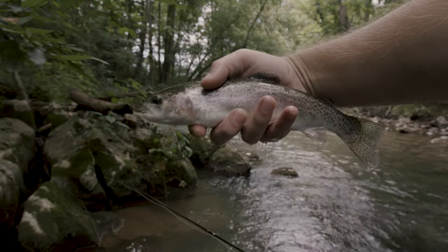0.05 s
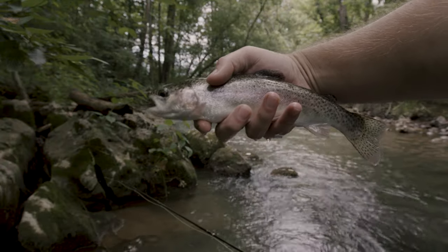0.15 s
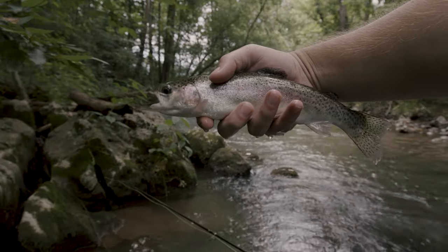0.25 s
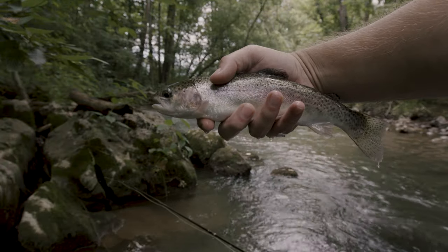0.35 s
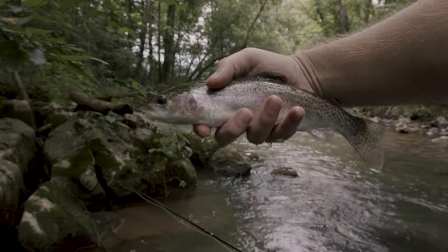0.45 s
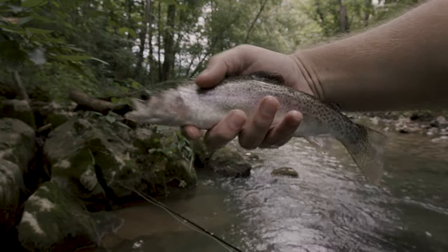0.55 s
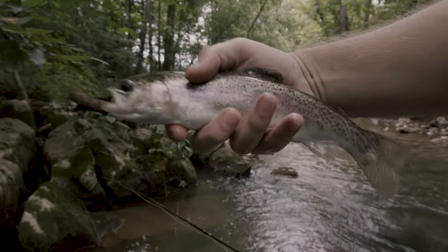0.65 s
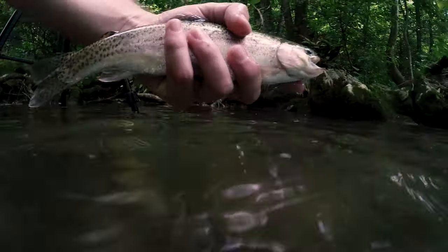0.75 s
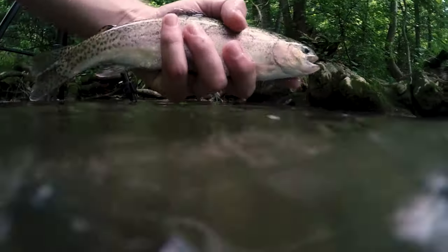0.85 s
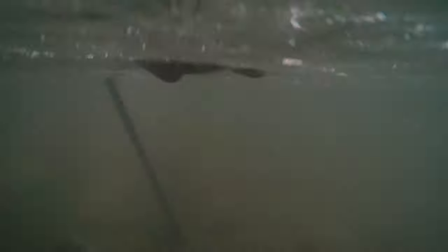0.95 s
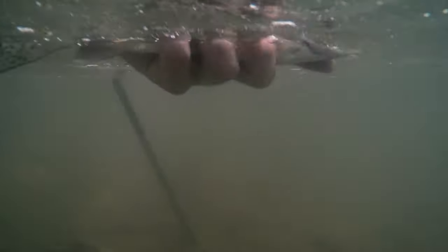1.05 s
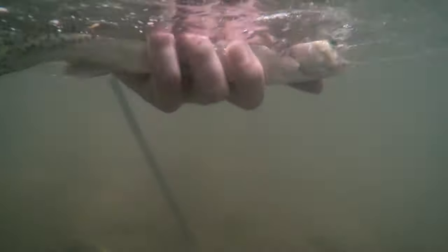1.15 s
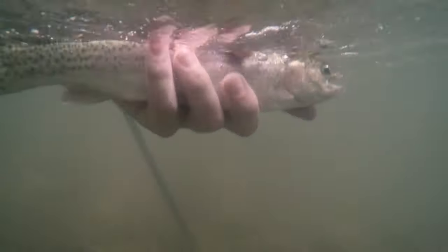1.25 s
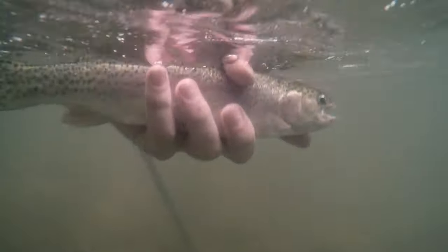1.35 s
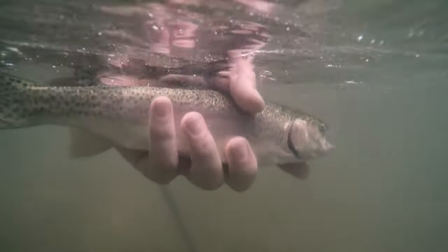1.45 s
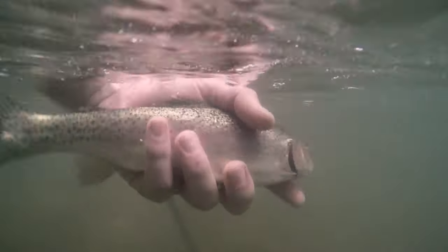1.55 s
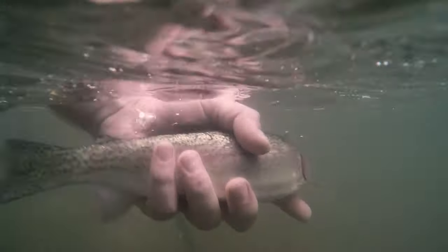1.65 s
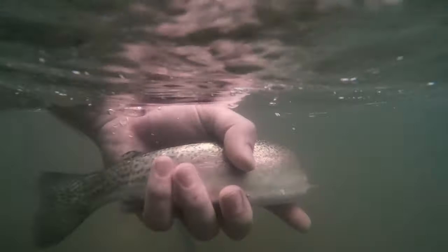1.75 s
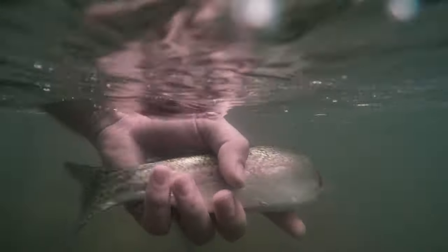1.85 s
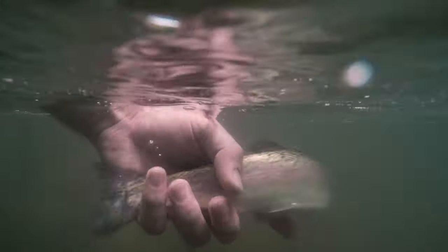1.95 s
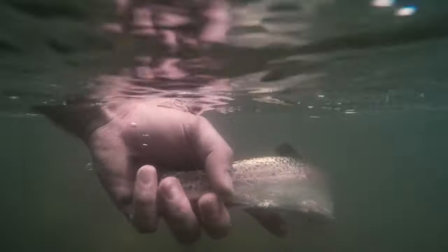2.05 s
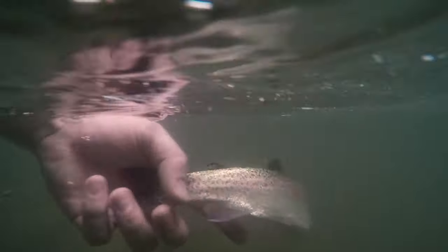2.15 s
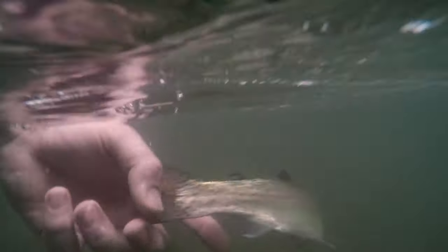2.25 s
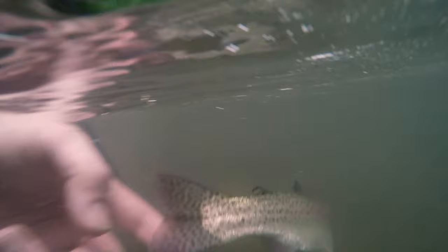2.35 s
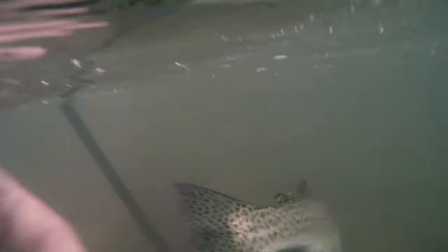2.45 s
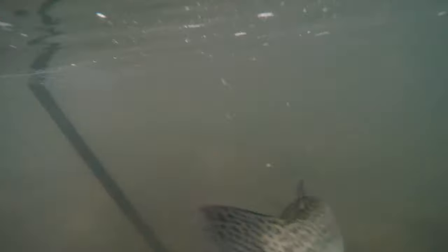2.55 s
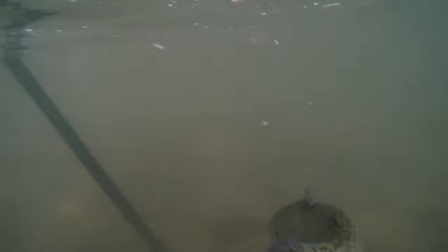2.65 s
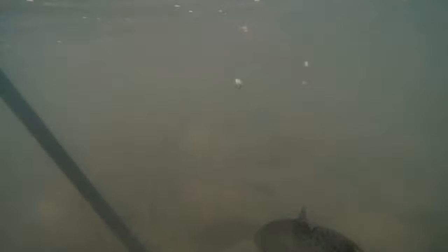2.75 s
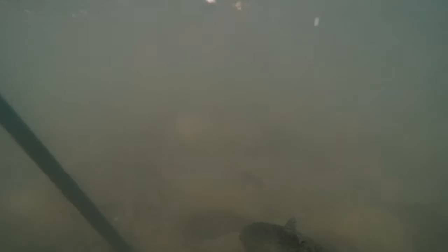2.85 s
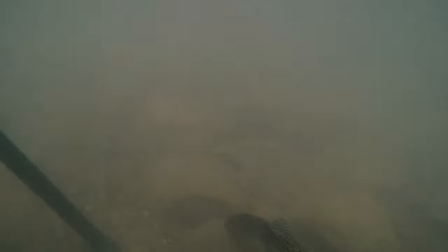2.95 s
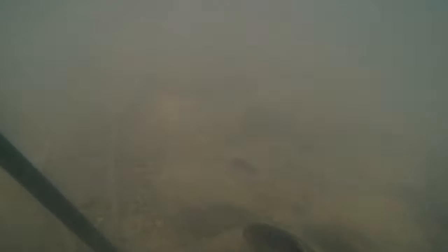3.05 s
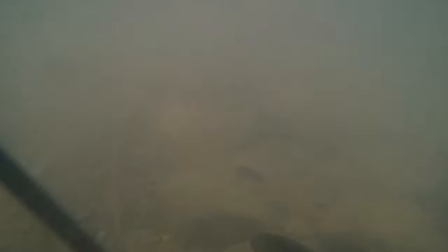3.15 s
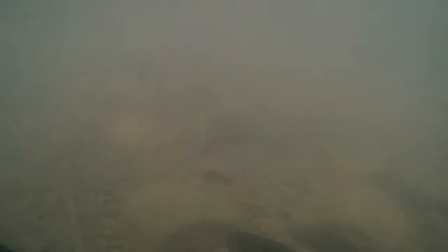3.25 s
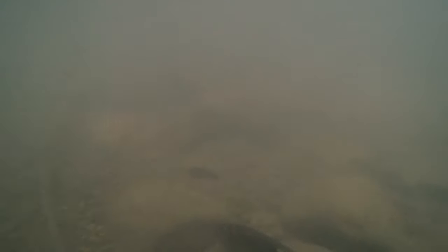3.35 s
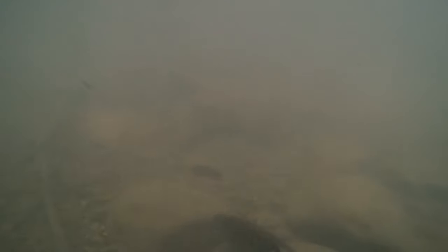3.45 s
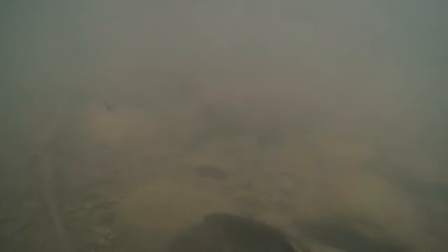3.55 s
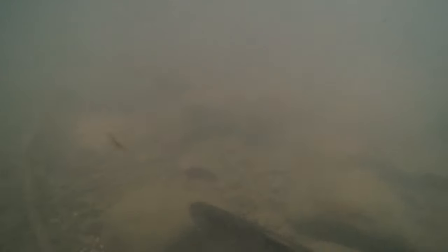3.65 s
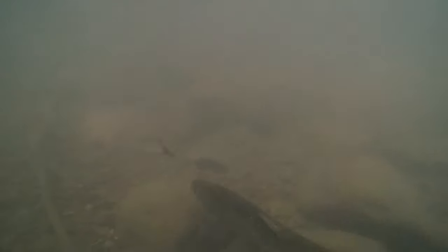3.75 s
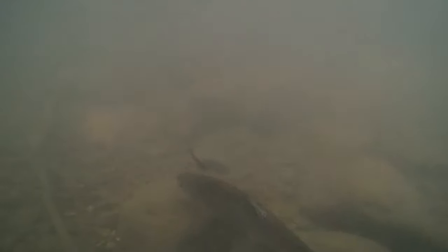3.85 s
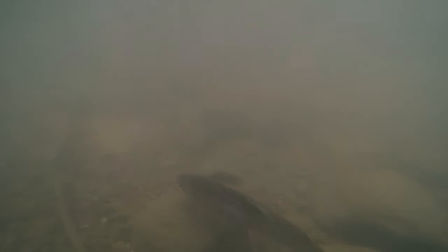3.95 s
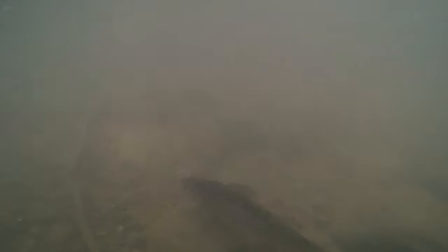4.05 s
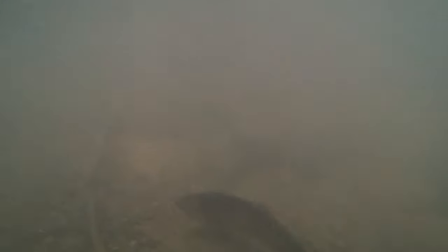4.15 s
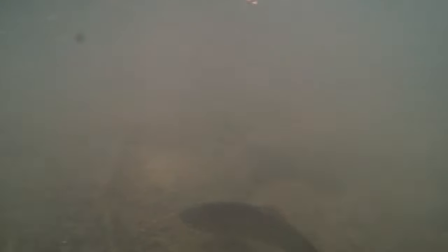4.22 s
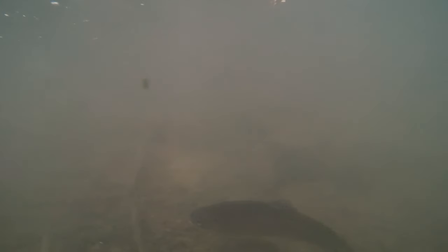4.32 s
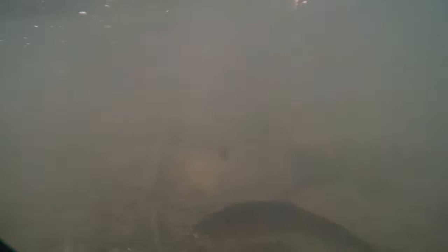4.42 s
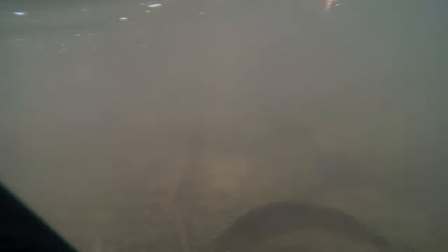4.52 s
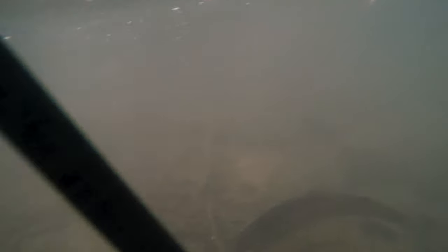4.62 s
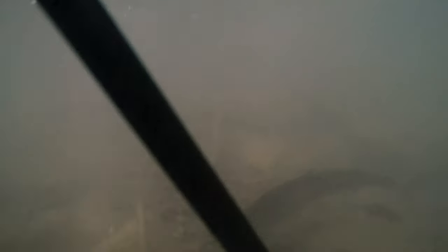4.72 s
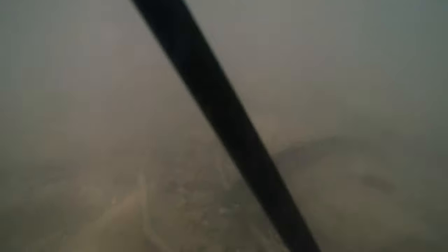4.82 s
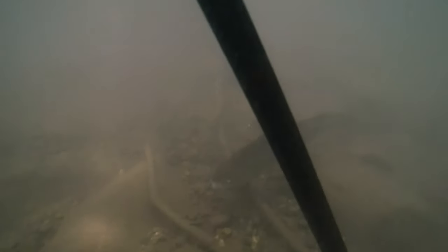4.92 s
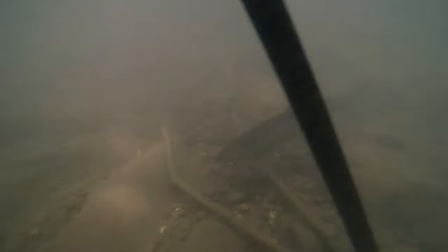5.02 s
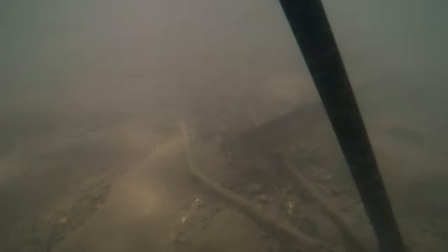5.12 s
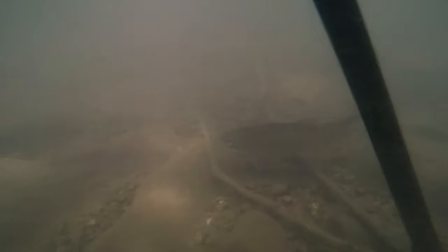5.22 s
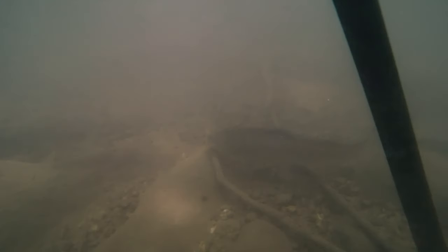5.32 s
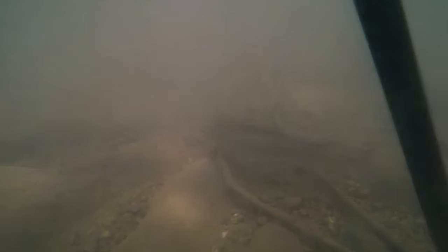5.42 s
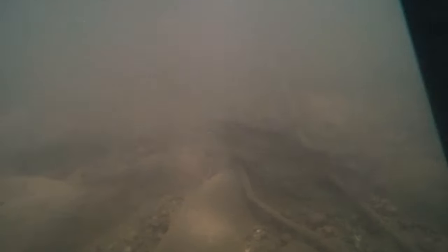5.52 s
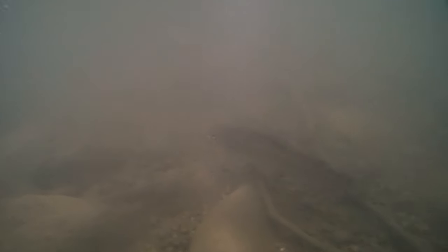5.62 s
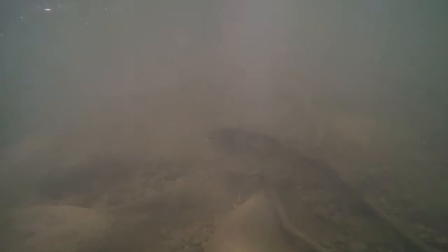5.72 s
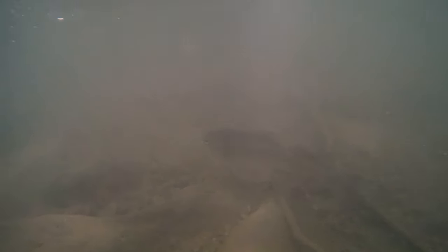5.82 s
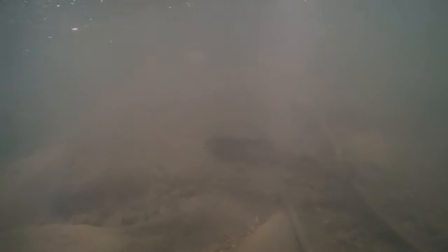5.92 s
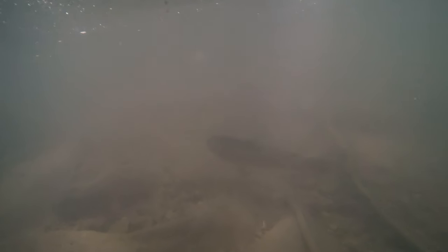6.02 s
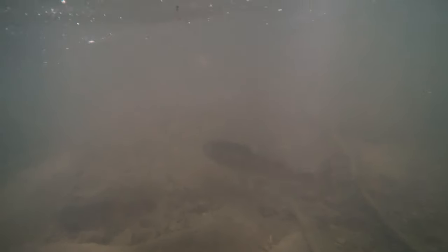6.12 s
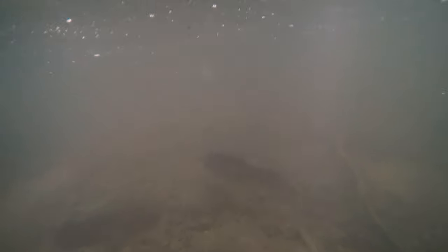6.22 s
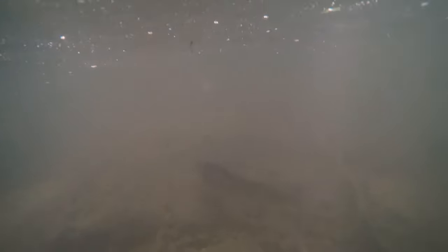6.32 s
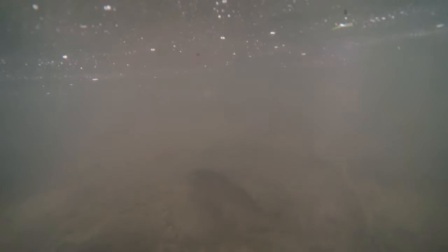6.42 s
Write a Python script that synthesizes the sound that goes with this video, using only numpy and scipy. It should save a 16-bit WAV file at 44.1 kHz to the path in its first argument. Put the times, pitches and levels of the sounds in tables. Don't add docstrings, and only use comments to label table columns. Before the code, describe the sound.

Close to a small woodland stream, water rushes brightly for under a second. The microphone, sealed in a case, plunges beneath the surface: dense, hard bubble bursts, crackle and gurgling churn, all close and mono. It calms to deep muffled rumble, then pops again with hollow knocks as a fish is released. One big bass thump rocks the case; afterwards only low rumble, occasional knocks and tiny bubbles remain.

```python
import sys
import numpy as np
from scipy import signal
from scipy.fft import rfft, irfft
from scipy.io import wavfile
from scipy.ndimage import uniform_filter1d

SR = 44100
rng = np.random.default_rng(int(sys.argv[2]) if len(sys.argv) > 2 else 0)


def boost(x):
    u = np.asarray(x, float) / 20
    return 10 ** u


def transcribe(u):
    v = np.clip(np.atleast_2d(u).T, -1, 1)
    q = np.round(v * 32767).astype(np.int16)
    wavfile.write(sys.argv[1], SR, q)


N = 285768

# start in seconds, peak in dB, pitch in Hz, second pitch in Hz, crack in dB.
POCKETS = [(0.8104, -7.5, 1710, 1640, -59), (0.8176, -23, 1790, 705, -9),
           (0.8419, -11, 3700, 2280, -25), (0.868, -13.5, 590, 6260, -12.5),
           (0.874, -12.5, 2020, 690, -13), (0.8857, -22.5, 4540, 2230, -22.5),
           (0.8988, -23, 4500, 2630, -15), (0.9046, -11.5, 1020, 2900, -43.5),
           (0.9269, -20.5, 1020, 3700, -55.5), (0.932, -2.5, 2270, 4510, -40.5),
           (0.959, -23, 6700, 4350, -23), (0.9986, -27, 2210, 3900, 1), (1.0222, -7.5, 3560, 1910, -33),
           (1.0661, -13.5, 890, 660, -55), (1.0893, -16.5, 4000, 660, -42.5),
           (1.114, -20.5, 3470, 585, -24), (1.1204, -11.5, 3360, 5600, -17.5),
           (1.1366, -16.5, 4880, 1600, -12), (1.1421, -9, 1670, 680, 1.5),
           (1.1465, -10.5, 560, 2500, -15), (1.1609, -14.5, 3290, 1920, -25.5),
           (1.1706, -17, 3728, 1450, -17.5), (1.1896, -11.5, 3800, 1450, -1),
           (1.1944, 0.5, 3430, 1338, -3.5),
           (2.2032, -28, 3840, 1530, -38), (2.2529, 5, 1209, 710, -29.5),
                   (2.2718, -9, 1034, 610, -51), (2.2823, -13, 3356, 5100, 0),
                   (2.2996, -17.5, 2543, 1120, -52), (2.3081, -23.5, 3300, 2200, 1),
                   (2.3371, -9, 1650, 3500, -56), (2.3472, -19, 1690, 880, -28),
                   (2.3908, -11, 2100, 920, -54), (2.459, -17, 2510, 670, -28), (2.4673, -14, 659, 844, -7),
                   (2.4724, -11.5, 3717, 620, -3), (2.4894, -20.5, 2520, 397, -22),
                   (2.4982, -21, 3390, 1800, -46), (2.5114, -1.5, 1655, 600, -31.5),
                   (2.6519, -23.5, 2920, 6390, -25), (2.6943, -35, 5730, 2760, -20),
                   (2.709, -16, 2510, 560, -25), (2.744, -25.5, 2360, 4500, -17),
                   (2.761, -21, 2560, 1300, -12), (2.7953, -25, 4500, 1590, -28),
                   (2.8593, -24, 2340, 570, -15), (2.8756, -12.5, 1890, 3430, -26),
           (1.211, -17.5, 3530, 1740, -47), (1.229, -22, 4570, 1380, -26),
              (1.261, -24.5, 1785, 1066, -53), (1.6951, -28, 2570, 555, -36),
              (1.7074, -25.5, 575, 885, -45), (1.9782, -29, 513, 3190, -19),
              (1.9996, -25.5, 576, 3660, -40), (2.0742, -38.5, 4290, 2040, -6),
              (3.0173, -12.5, 600, 1160, -39.5), (3.1353, -21, 580, 930, -38),
              (3.1422, -17.5, 4830, 2650, -20), (3.1889, -21.5, 600, 1550, -49),
              (3.1979, -10, 600, 860, -39.5), (3.2183, -21.5, 500, 1460, -32),
              (3.2559, -34.5, 2580, 4200, -33), (3.6327, -34.5, 1540, 610, -40.5),
              (3.6477, -38, 1850, 556, -30), (3.6849, -37, 600, 1713, -39), (4.0956, -44, 3810, 5960, -5),
              (4.7276, -14.5, 1644, 2083, -43), (4.773, -18.5, 950, 1530, -43),
              (4.7929, -16, 1550, 1196, -46), (4.996, -41, 550, 1445, -40)]
# start in seconds, peak in dB, pitch in Hz.
SMALL_POCKETS = [(0.803, -31, 1720), (0.8586, -28, 5600), (1.0817, -22, 720), (1.104, -30, 3620),
                 (1.1262, -28, 1750), (1.1774, -23, 3800), (1.2445, -22.5, 1590), (1.2936, -45, 610),
                 (1.3785, -45.5, 2350), (1.5616, -39, 2800), (1.67, -37, 2760), (1.7297, -31, 3320),
                 (1.7548, -40, 1900), (1.889, -37, 3600), (1.9007, -44, 2660), (2.119, -37, 3800),
                 (2.5311, -25, 1670), (2.5702, -32.5, 3450), (2.5763, -32, 1860), (2.5852, -33.5, 3370),
                 (2.5995, -36.5, 2180), (2.613, -33, 1360), (2.6755, -44, 2820), (2.77, -34, 2260),
                 (2.8682, -37, 2010), (2.9703, -27, 1050), (3.2618, -28, 910), (3.6686, -37, 1650)]
SMALL_SECOND_HZ, SMALL_CRACK_DB = 600, -25
SECOND_DB, SECOND_SINKS = -7, 0.074
CRACK_HZ, CRACK_RISES = 9500, .15
TAIL_HZ, TAIL_WIDTH_HZ, TAIL_DB = 640, 38, -10.5

# start in seconds, peak in dB, pitch in Hz, 60 dB decay in seconds.
AIR_BUBBLES = [(1.211, -27, 1850, 0.047), (1.246, -20, 1640, 0.043), (1.263, -42.5, 1800, 0.13),
               (2.345, -13, 1780, 0.042), (2.515, -7, 1680, 0.028), (2.655, -24, 2175, 0.034),
               (4.733, -44, 1820, 0.11), (4.774, -15.5, 1450, 0.021), (4.8, -37.5, 1880, 0.041),
               (2.712, -20.5, 2250, 0.029), (2.837, -34, 2020, 0.053), (0.811, -33, 1600, 0.058),
               (0.764, -25, 324, 0.12), (0.774, -27.5, 207, 0.083), (0.779, -28, 4090, .01),
               (0.147, -27, 672, .05), (0.42, -33, 580, .06), (1.212, -27, 3520, 0.035),
               (1.23, -36, 4640, 0.041), (2.499, -25.5, 3500, 0.031), (3.647, -33.5, 1880, 0.062),
               (4.796, -37, 1940, 0.028), (3.119, -38, 3300, .012), (1.067, -20, 300, 0.073),
               (1.1, -27.5, 290, .06), (2.279, -21.5, 390, .015), (2.407, -31, 390, 0.068),
               (2.47, -21, 396, .05), (2.758, -33, 390, 0.067), (3.106, -29, 383, 0.074),
               (4.728, -35.5, 3570, .008), (2.355, -31, 1810, .09), (2.526, -29, 1720, .07),
               (4.776, -27, 980, .03),
               (0.868, -16.0, 6590, 0.012), (0.875, -12, 2540, 0.014), (0.876, -22.5, 3530, 0.029),
                 (0.88, -19.5, 5340, 0.0087), (0.902, -25.5, 4570, 0.01), (0.903, -16, 1550, 0.01),
                 (0.932, -13.0, 1030, 0.013), (0.932, -10.0, 4910, 0.01), (0.932, -8.5, 5470, 0.011),
                 (0.932, -5.5, 4440, 0.019), (1.022, -4.5, 3620, 0.013), (1.072, -16, 1550, 0.0098),
                 (1.089, -19.0, 650, 0.008), (1.112, -26, 4570, 0.053), (1.119, -20.0, 6630, 0.008),
                 (1.12, -23, 1640, 0.026), (1.136, -27.5, 3320, 0.026), (1.141, -17.5, 5730, 0.0069),
                 (1.142, -17.0, 2580, 0.01), (1.149, -25.0, 4390, 0.008), (1.151, -23.5, 3450, 0.008),
                 (1.15, -20, 2110, 0.012), (1.159, -19.0, 650, 0.008), (1.159, -24.5, 1120, 0.022),
                 (1.193, -16.5, 8310, 0.008), (1.195, -4.0, 4090, 0.008), (1.194, -14.5, 5860, 0.008),
                 (1.261, -17.5, 1770, 0.01),
               (2.251, -26, 2710, 0.014), (2.252, -25, 2250, 0.018), (2.253, -31.0, 5680, 0.008),
                     (2.28, -7.5, 1820, 0.011), (2.281, -13, 2270, 0.027), (2.307, -27.0, 2150, 0.008),
                     (2.308, -29, 900, 0.01), (2.39, -21, 3420, 0.008), (2.408, -25, 950, 0.01),
                     (2.428, -23, 1550, 0.011), (2.458, -26.0, 3360, 0.014), (2.458, -25, 3960, 0.008),
                     (2.471, -22, 6600, 0.008), (2.472, -22.0, 5510, 0.008), (2.471, -17.0, 2540, 0.008),
                     (2.513, -21, 6680, 0.0093), (2.651, -31, 4050, 0.01), (2.695, -28, 2630, 0.011),
                     (2.743, -39, 2750, 0.013), (2.761, -24, 600, 0.018), (2.795, -29.0, 2630, 0.01),
                     (2.795, -24, 4850, 0.015), (2.796, -27.0, 1590, 0.02), (3.017, -27, 2120, 0.008),
                     (3.018, -20.5, 2670, 0.0068), (3.018, -25, 600, 0.008), (3.142, -22, 5990, 0.0092),
                     (3.142, -19.5, 3500, 0.0089), (3.196, -21.5, 3220, 0.017), (3.198, -23, 2625, 0.039),
                     (3.204, -21.0, 1475, 0.045), (3.208, -23, 2500, 0.014), (3.212, -27, 518, 0.058),
                     (3.261, -31, 2180, 0.02), (3.265, -29, 734, 0.008), (3.686, -28, 600, 0.039)]
# start in seconds, peak in dB, pitch in Hz.
NEAR_BUBBLES = [(3.9687, -42, 2520), (4.078, -50.5, 2340), (4.2114, -48, 2530), (4.2935, -42.5, 3250),
                (4.5377, -42.5, 3190), (5.0935, -42.5, 3360), (4.878, -50.5, 1550), (5.112, -46, 3860),
                (5.295, -52, 4430), (5.1314, -42.5, 1583), (5.6286, -44.5, 3320), (5.647, -40, 2530),
                (5.7337, -27.5, 1814), (5.9103, -29, 2250), (5.9785, -48, 2420), (6.0722, -48, 1590),
                (6.1564, -43.5, 1830), (6.285, -44, 2024)]
# start in seconds, peak in dB, pitch in Hz.
FAR_BUBBLES = [(1.299, -47, 600), (1.73, -37, 2390), (1.742, -46, 560), (1.878, -37, 3360),
               (1.887, -37, 2540), (1.889, -38, 2110), (1.977, -44, 1210), (1.977, -35.0, 3600),
               (1.978, -35, 2540), (2.0, -38, 1690), (2.02, -48, 600), (3.753, -49, 2200),
               (3.909, -45.0, 2114), (3.929, -46.0, 2260), (4.015, -45, 2240), (4.166, -49.0, 2370),
               (4.19, -43.5, 2590), (4.194, -50.5, 1470), (4.293, -42.0, 2624), (4.571, -46.5, 1550),
               (4.875, -48, 2930), (4.996, -49, 1457), (5.017, -47.0, 1510), (5.081, -52.0, 1510),
               (5.09, -43, 1940), (5.1, -43, 1510), (5.105, -47, 2500), (5.11, -44, 3400),
               (5.131, -45.0, 2240), (5.202, -51, 2290), (5.208, -50.0, 1580), (5.215, -50.0, 2630),
               (5.281, -49.5, 2370), (5.328, -49, 3700), (5.338, -39.5, 2260), (5.348, -45, 1870),
               (5.373, -50.0, 2195), (5.414, -47, 2330), (5.417, -46, 2840), (5.424, -42.5, 3260),
               (5.441, -48, 2280), (5.484, -47.0, 1467), (5.511, -43, 3360), (5.615, -44, 3320),
               (5.644, -50, 1770), (5.731, -40, 3320), (5.751, -50, 3020), (5.758, -51, 1810),
               (5.76, -40.5, 2540), (5.784, -46.5, 2950), (5.79, -47.0, 2800), (5.799, -53, 1980),
               (5.81, -48.0, 2450), (5.863, -45, 2580), (5.919, -46.5, 2895), (5.99, -41.0, 2370),
               (6.064, -48, 1884), (6.188, -46, 3790), (6.473, -33.5, 2496)]
NEAR_CYCLES, FAR_CYCLES = 55, 52

# start in seconds, peak in dB, pitch in Hz, length in cycles.
SHOVES = [
    (3.255, -2.5, 38.5, 1.57),
    (3.76, -17, 24, 1.37),
    (4.879, -20.5, 97, 1.1),
    (6.389, -21, 22.8, 1.07),
    (2.299, -23, 92, 2.8),
]
# start in seconds, peak in dB.
NUDGES = [(0.901, -28), (1.064, -25), (1.142, -27), (1.242, -40.5), (1.749, -40.5), (1.972, -37),
          (2.245, -22.5), (2.383, -22.5), (2.419, -32), (2.465, -20.5), (2.54, -32.5), (2.679, -29.5),
          (2.757, -28.5), (2.871, -36.5), (3.11, -26.5), (3.254, -32), (3.607, -34.5), (3.676, -36),
          (4.017, -45.5), (4.88, -36.5), (5.24, -41.5), (5.467, -50), (5.735, -43), (6.017, -42.5),
          (6.135, -46), (6.249, -45.5)]
NUDGE_RISE_S, NUDGE_T60_S = 0.0045, .18
NUDGE_SAG, SAG_S = 0.077, .02
THUD_DB, THUD_S = 6.5, .004
HUM_HZ, HUM_WIDTH_HZ, HUM_UNDER_CURRENT_DB = 216, 18, -28

# time in seconds, force in dB, loose air in it in dB.
CURRENT = [(0.78, -39, -12), (0.81, -23, -32), (1.02, -47, -56.5), (1.08, -36, -44), (1.3, -38, -63),
           (1.8, -37, -57.5), (2.2, -37, -57.5), (2.27, -25, -45.5), (2.41, -33, -46), (2.95, -30, -49),
           (3.08, -21.5, -49.5), (3.27, -24.5, -51), (3.41, -29.5, -59.5), (3.75, -36, -61.5),
           (4.5, -34.5, -62), (4.85, -31, -60.5), (5.2, -35.5, -58), (6.48, -37.5, -62)]
# frequency in Hz, level in dB per Hz.
ROCKING = [(8.8, -18), (15, 3.5), (27, 8), (41, 5), (141, -22), (216, -26), (269, -41.5), (400, -39),
           (520, -75), (880, -120)]

# frequency in Hz, width in Hz, level in dB.
SHELL = [(454, 280, 4.5), (600, 65, 2), (1220, 180, -5.5), (1550, 190, 1), (1865, 220, -3),
         (2250, 290, -0.5), (2650, 260, -3), (3360, 290, -9), (4500, 600, -17.5)]
GRIT_PER_S, GRIT_DB = 220, 3
FIZZ_GROWS = .3
# start in seconds, length in seconds, wash in dB, crackle in dB.
SWISHES = [
    (0.83, .085, -42, -46),
    (1.07, .115, -37, -46),
    (1.692, 0.046, -69.5, -74),
    (2.35, 0.11, -39, -68),
    (2.45, .05, -41, -64),
    (3.184, 0.036, -35, -75),
    (3.245, 0.025, -42, -66),
    (3.596, 0.11, -48.5, -85),
    (3.66, 0.06, -48, -85),
]

# frequency in Hz, level in dB.
HISS = [(410, -34.5), (700, -7.5), (1130, -6.5), (1500, -12.5), (2310, -6.5), (3110, -6.5), (12000, -17),
        (15500, -25)]
HISS_DB = -66

# frequency in Hz, level in dB per Hz.
STREAM = [(15, -51), (25, -3), (79, -5.5), (156, -21), (246, -9), (614, -5), (762, -6.5), (1710, -7.5),
          (3440, -12), (5430, -20.5), (10100, -39.5), (15500, -33)]
# time in seconds, level in dB.
STREAM_LEVEL = [(0, -35.5), (.3, -34.5), (.76, -35.5)]
# frequency in Hz, left-right likeness from -1 to 1.
LIKENESS = [(60, 0.94), (180, 1), (550, 0.59), (1650, -0.61), (4970, 0.17), (15000, -0.013)]
# frequency in Hz, left minus right in dB.
LEAN = [(60, -1.5), (240, 1.5), (950, -4.5), (3770, -3.5), (15000, 0.5)]
CHANGE_START_S, CHANGE_END_S = 0.81, .815


def rms_one(x):
    return x / np.sqrt(np.mean(x ** 2) + 1e-20)


def in_time(rows):
    s, *columns = np.transpose(rows)
    return [np.interp(np.arange(N) / SR, s, column) for column in columns]


def at_hz(points, hz):
    points_hz, values = np.transpose(points)
    return np.interp(np.log(hz), np.log(points_hz), values)


def drift(rate):
    r = np.exp(-80 * np.pi * rate / SR)
    white = rng.standard_normal(N // 40 + 2002)
    slow = signal.lfilter([1], [1, -2 * r, r * r], white)[2000:]
    return np.interp(np.arange(N) / 40, np.arange(len(slow)), rms_one(slow))


def resonate(x, hz, width_hz):
    r = np.exp(-np.pi * width_hz / SR)
    poles = [1, -2 * r * np.cos(2 * np.pi * hz / SR), r * r]
    return signal.lfilter((1 - r * r) / 2 * np.array([1, 0, -1]), poles, x)


def butter(x, order, hz, kind):
    return signal.sosfilt(signal.butter(order, hz, kind, fs=SR, output="sos"), x)


def band_noise(low_hz, high_hz):
    return rms_one(butter(rng.standard_normal(N), order=2, hz=[low_hz, high_hz], kind="band"))


def coloured(spectrum):
    hz = np.arange(N // 2 + 1) * SR / N + 1e-3
    inside = (hz > spectrum[0][0]) & (hz < spectrum[-1][0])
    return rms_one(irfft(rfft(rng.standard_normal(N)) * boost(at_hz(spectrum, hz)) * inside, N))


def evened(x, span_s, share):
    swell = np.sqrt(uniform_filter1d(x * x, int(span_s * SR)) + 0.025)
    return rms_one(x / swell ** np.clip(share, 0, 1))


def grains(per_s, spread_db):
    sizes = boost(spread_db * np.minimum(rng.exponential(1, N), 4)) * rng.choice([-1, 1], N)
    return sizes * (rng.random(N) < per_s / SR) + 1e-18


def bubble(t, hz, t60, rise, swell_cycles):
    swell = (1 - np.exp(-t * hz / swell_cycles)) ** 2
    return np.sin(2 * np.pi * hz * t * (1 + rise * t / t60)) * boost(-60 * t / t60) * swell


def pockets(cycles, shortest_s, spatter_db, tail_db, crack_s):
    out, t = np.zeros(N), np.arange(int(.06 * SR)) / SR
    small = [(*row, SMALL_SECOND_HZ, SMALL_CRACK_DB) for row in SMALL_POCKETS]
    rows = [*POCKETS, *small]
    noises = rng.standard_normal((len(rows), 3, len(t)))
    spatter = boost(spatter_db) * np.exp(-t / 0.0019)
    tail = boost(tail_db) * np.exp(-t / 0.0037)
    burst = (spatter + tail) * (1 - np.exp(-t / 0.00044))
    snap = (t / crack_s) * np.exp(1 - t / crack_s)
    for (s, db, hz, other_hz, crack_db), (fine, coarse, second) in zip(rows, noises):
        crack_hz = min(CRACK_HZ * boost(-CRACK_RISES * (db + 13.0)), 13000)
        crack_band = [0.4 * crack_hz, min(1.17 * crack_hz, 16000)]
        crack = boost(crack_db + 2.0) * butter(fine * snap, order=2, hz=crack_band, kind="band")
        other_db = SECOND_DB - SECOND_SINKS * (db + 19.5)
        sound = 0
        for pitch_hz, part_db, noise in ((hz, 0, coarse), (other_hz, other_db, second)):
            rough = resonate(resonate(noise * burst, pitch_hz, .45 * pitch_hz), pitch_hz, .7 * pitch_hz)
            t60 = shortest_s + cycles / pitch_hz
            clean = bubble(t, pitch_hz, t60, rise=0.0067, swell_cycles=0.18)
            sound = sound + boost(part_db + 1.5) * (clean + rough * np.sqrt(4000 / pitch_hz))
        sound = butter(sound, order=4, hz=min(1.46 * max(hz, other_hz), 12000), kind="low")
        at = int((s - .0005) * SR)
        out[at:at + len(t)] += boost(db) * (sound + crack)
    return out


def chirps():
    out, t = np.zeros(N + SR), np.arange(int(.2 * SR)) / SR
    near = [(s, db + 5.0, hz, NEAR_CYCLES / hz) for s, db, hz in NEAR_BUBBLES]
    far = [(s, db, hz, FAR_CYCLES / hz) for s, db, hz in FAR_BUBBLES]
    for s, db, hz, t60 in [*AIR_BUBBLES, *near, *far]:
        at = int((s - .001) * SR)
        out[at:at + len(t)] += boost(db) * bubble(t, hz, t60, rise=0.012, swell_cycles=0.98)
    return out[:N]


def popping_air():
    pops = pockets(cycles=4.3, shortest_s=0.01, spatter_db=4.5, tail_db=-23.5, crack_s=0.00045) + chirps()
    return pops + boost(TAIL_DB) * resonate(pops, TAIL_HZ, TAIL_WIDTH_HZ)


def shoves():
    out, t = np.zeros(N), np.arange(N) / SR
    for s, db, hz, cycles in SHOVES:
        turn = np.clip((t - s) * hz, 0, cycles)
        out -= boost(db) * np.sin(2 * np.pi * turn) * np.sin(np.pi * (turn / cycles) ** 0.94) ** 2
    return out


def nudges():
    t, swell, note = np.arange(int(.4 * SR)) / SR, np.zeros(N + SR), np.zeros(N + SR)
    shape = boost(-60 * t / NUDGE_T60_S) * (1 - np.exp(-t / NUDGE_RISE_S))
    sagging_t = t + NUDGE_SAG * SAG_S * (1 - np.exp(-t / SAG_S))
    ring = shape * np.sin(2 * np.pi * HUM_HZ * sagging_t)
    thud = boost(THUD_DB) * (1 - t / (2 * THUD_S)) * t / THUD_S * np.exp(1 - t / THUD_S)
    for s, db in NUDGES:
        at = int(s * SR)
        swell[at:at + len(t)] += boost(db) * shape
        note[at:at + len(t)] += boost(db) * (ring - thud)
    return swell[:N], note[:N]


def current_rumble(force_db):
    return boost(force_db + 2.5 * drift(15)) * evened(coloured(ROCKING), span_s=0.07, share=0.9)


def shell_hum(shaken):
    hum = resonate(resonate(rng.standard_normal(N), HUM_HZ, HUM_WIDTH_HZ), HUM_HZ, 3 * HUM_WIDTH_HZ)
    slosh = band_noise(110, 230)
    return shaken * (boost(-5.0) * evened(hum, span_s=.03, share=0.58) + boost(-5.5) * slosh)


def gritty():
    return rng.standard_normal(N) + boost(GRIT_DB) * rms_one(grains(GRIT_PER_S, 3.5))


def churn(lumpy_db, bubble_db):
    together, wash = 2.2 * drift(30), 0
    for k, (hz, width_hz, db) in enumerate(SHELL):
        gain = (-1) ** k * boost(db + together + lumpy_db * drift(30))
        wash = wash + gain * resonate(resonate(gritty(), hz, width_hz * 1.2), hz, width_hz * 1.2)
    clicks, dealt, bubbles = grains(160, 2.5), rng.integers(0, 16, N), 0
    for k, hz in enumerate(np.geomspace(1350, 3700, 16)):
        bubbles = bubbles + resonate(resonate(clicks * (dealt == k), hz, hz / 18), hz, hz / 5)
    return rms_one(rms_one(wash) + boost(bubble_db) * rms_one(bubbles))


def crackle():
    bursts = signal.lfilter([1], [1, -np.exp(-1 / (0.0004 * SR))], np.abs(grains(180, 4.2)))
    return rms_one(butter(bursts * rng.standard_normal(N), order=2, hz=[2500, 11000], kind="band"))


def swish_gain(column):
    t = np.arange(N) / SR
    return sum(boost(row[column]) * np.sin(np.pi * np.clip((t - row[0]) / row[1], 0, 1)) for row in SWISHES)


def passing_water(air_db):
    wash = churn(lumpy_db=4.5, bubble_db=-9)
    dull = butter(wash, order=3, hz=2900, kind="low")
    fizz_db = 3.0 * drift(40) - 16.0 + FIZZ_GROWS * (air_db - air_db.mean())
    fizz = boost(fizz_db) * band_noise(3300, 6500)
    swishes = swish_gain(column=2) * dull + swish_gain(column=3) * crackle()
    return boost(air_db) * (wash + fizz) + swishes


def gain_control(pops, depth, release_db_s):
    ramp = release_db_s * np.arange(N) / SR
    over_db = np.maximum(20 * np.log10(np.abs(pops) + 1e-9) + 22, 0)
    held_db = np.maximum.accumulate(over_db + ramp) - ramp
    return boost(-depth * uniform_filter1d(held_db, size=400))


def background_hiss(pops):
    return boost(HISS_DB) * coloured(HISS) * gain_control(pops, depth=0.33, release_db_s=53.0)


def stream(patchy_db, fleck_db):
    out, edges = 0, 22 * 2 ** np.arange(0, 9.7, 1 / 3)
    white = rng.standard_normal((2, 2, SR)) + boost(fleck_db) * grains(1800, 2.9)[:SR]
    for k, (low, high) in enumerate(zip(edges, edges[1:])):
        mid, side = butter(white[k % 2], order=2, hz=[low, high], kind="band")
        hz = np.sqrt(low * high)
        alike = np.clip(at_hz(LIKENESS, hz), -.3, .99)
        flicker_db = patchy_db * drift(23)[:SR]
        gain = boost(at_hz(STREAM, min(hz, 15000)) + flicker_db) / np.sqrt(1 + alike)
        lean = boost(at_hz(LEAN, hz) / 2 * np.array([[1], [-1]]))
        out = out + gain * lean * (np.sqrt(1 + alike) * mid + np.sqrt(1 - alike) * side * [[1], [-1]])
    out = signal.sosfilt(signal.ellip(10, .3, 50, 15700, fs=SR, output="sos"), out)
    out = out / np.sqrt(np.mean(out.mean(axis=0) ** 2))
    return np.pad(out, ((0, 0), (0, N - SR))) * boost(in_time(STREAM_LEVEL)[0])


def scene():
    force_db, air_db = in_time(CURRENT)
    pops = popping_air()
    swell, note = nudges()
    shaken = boost(force_db + HUM_UNDER_CURRENT_DB) + swell
    bed = current_rumble(force_db) + shell_hum(shaken) + passing_water(air_db) + background_hiss(pops)
    under = np.interp(np.arange(N) / SR, [CHANGE_START_S, CHANGE_END_S], [0, 1])
    housing = under ** 3 * bed + pops + shoves() + note
    above = stream(patchy_db=.7, fleck_db=-8)
    return np.sqrt(1 - under) * above + housing


def top_cut(x):
    return signal.sosfilt(signal.butter(12, 16510, fs=SR, output="sos"), x)


def record(dry):
    rounded = .98 * np.tanh(dry / .98)
    mix = signal.sosfilt(signal.cheby2(8, 50, 16600, fs=SR, output="sos"), rounded)
    return top_cut(mix)


dry = scene()
out = record(dry)
transcribe(out)
```